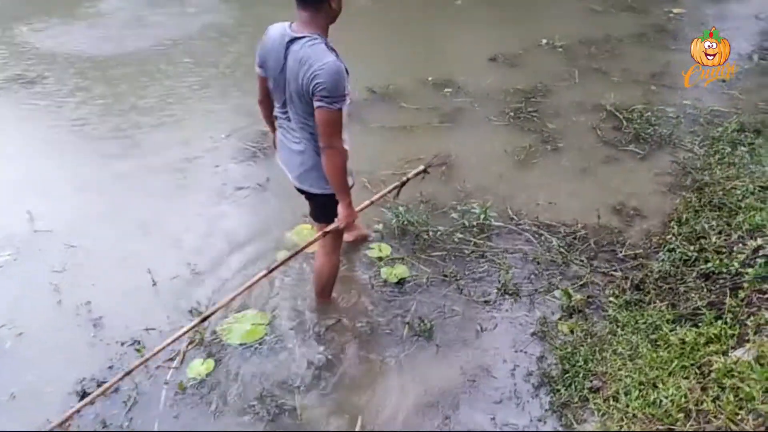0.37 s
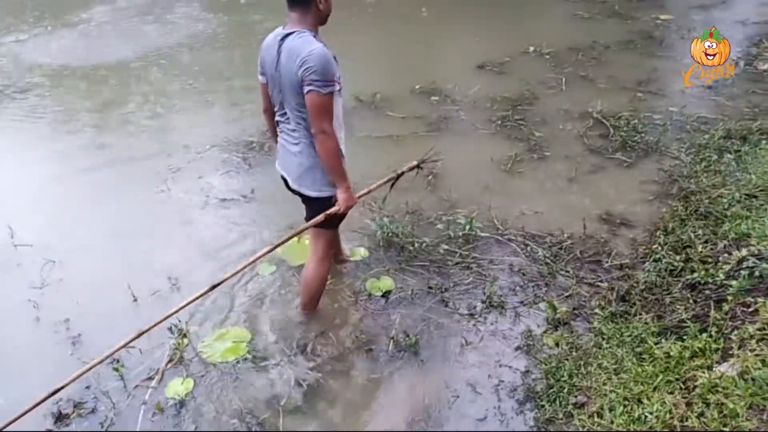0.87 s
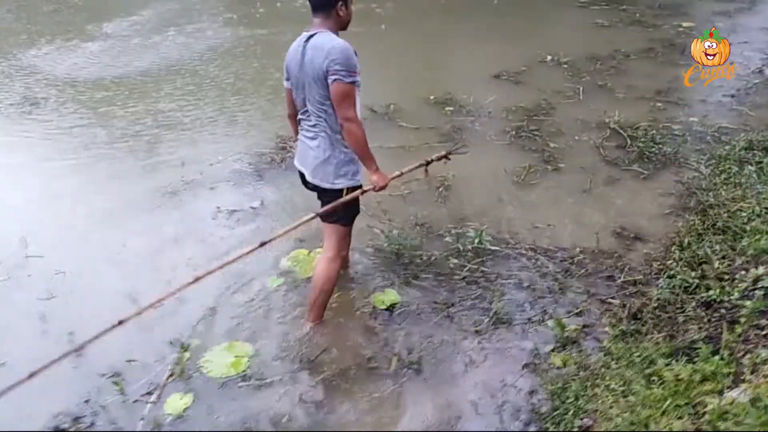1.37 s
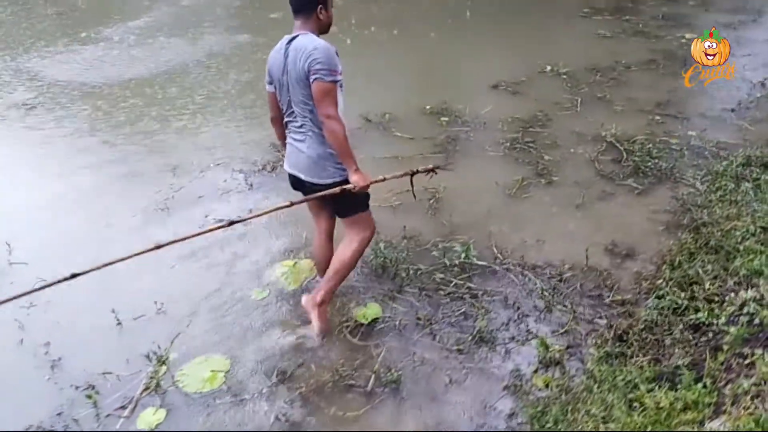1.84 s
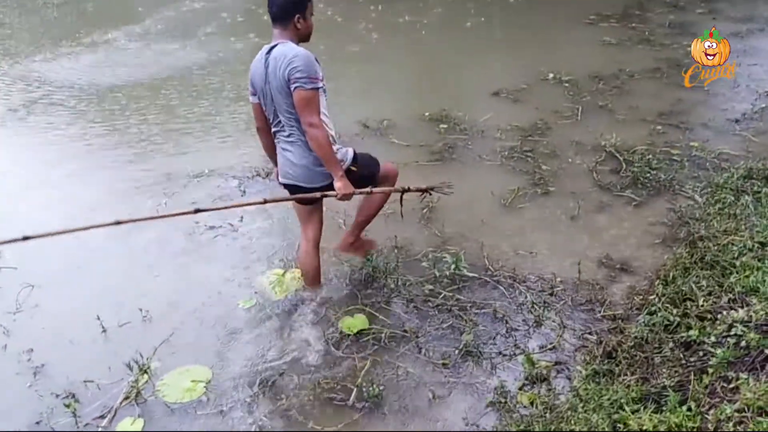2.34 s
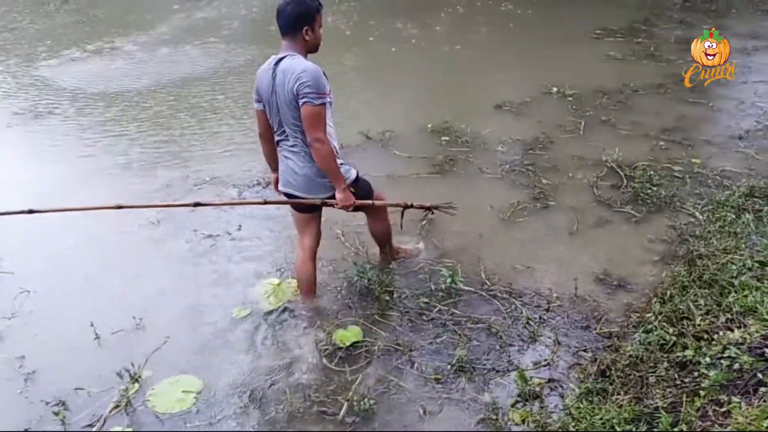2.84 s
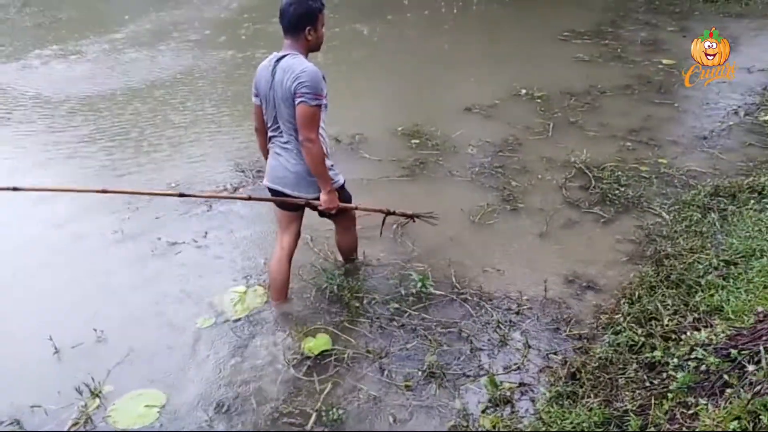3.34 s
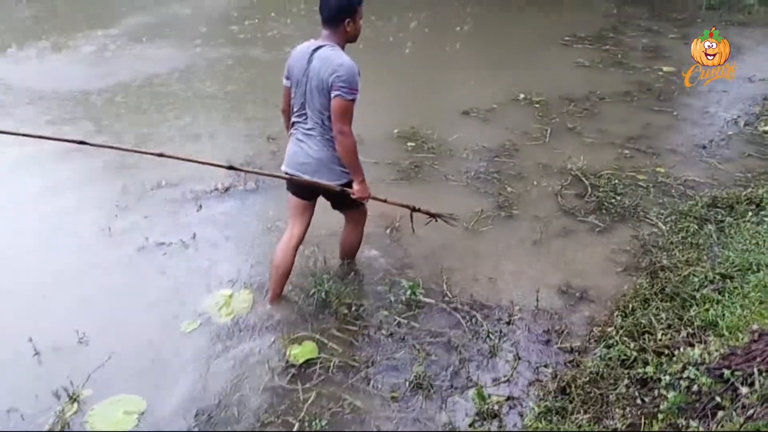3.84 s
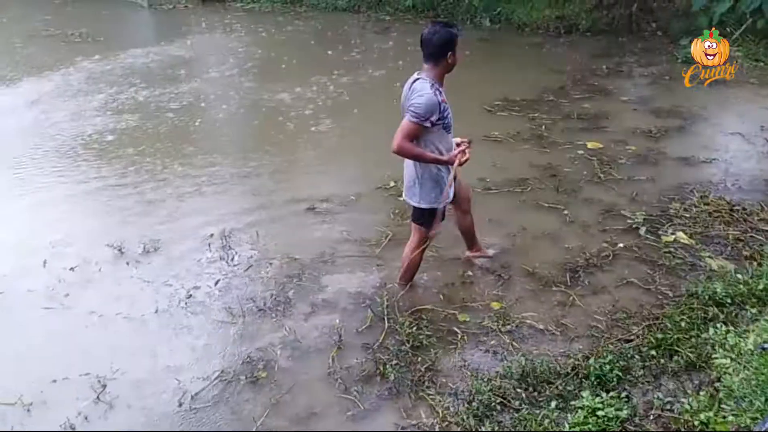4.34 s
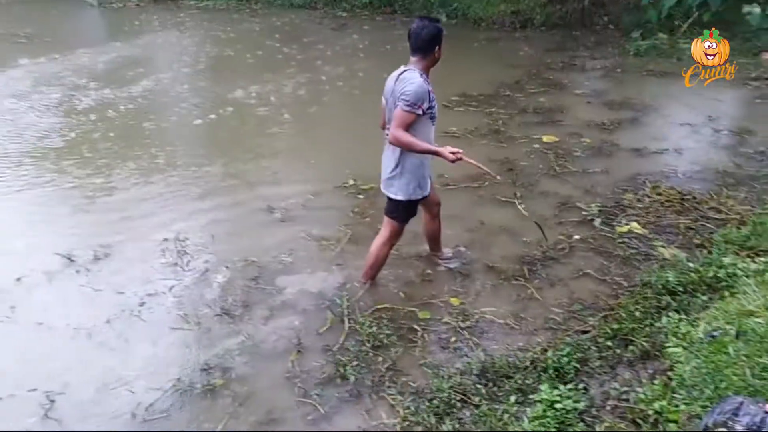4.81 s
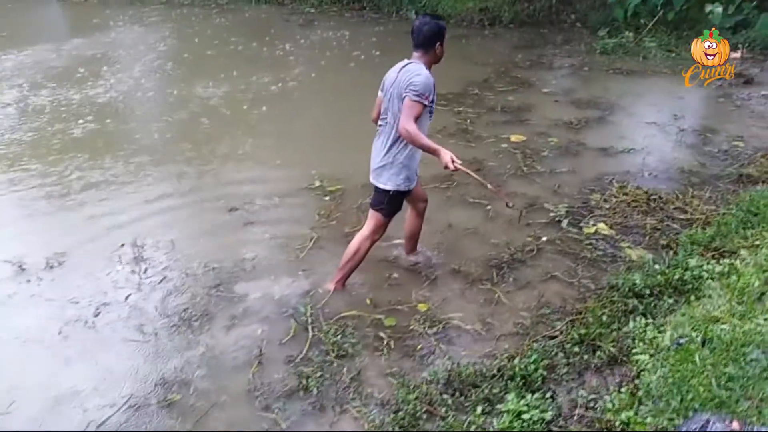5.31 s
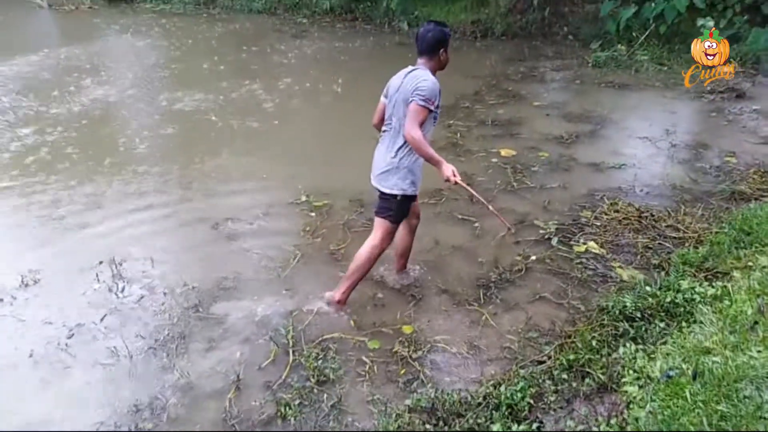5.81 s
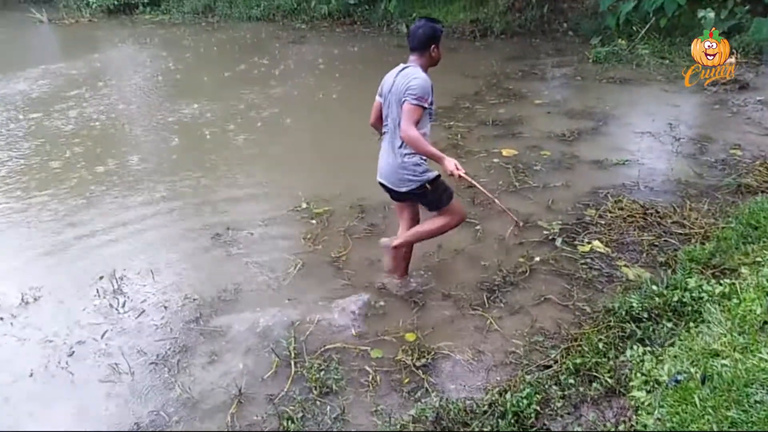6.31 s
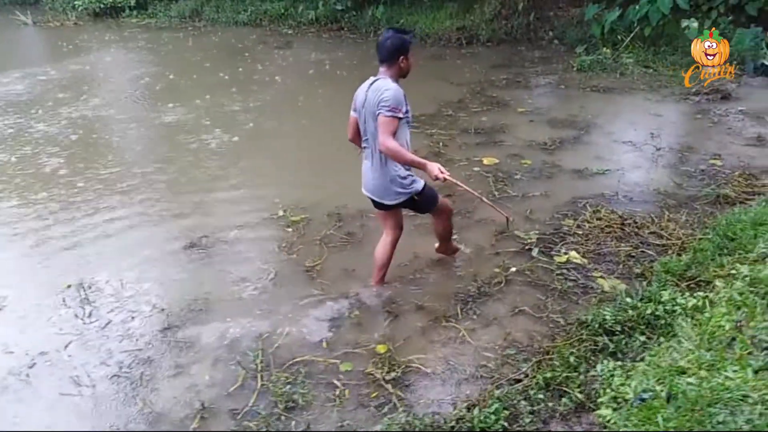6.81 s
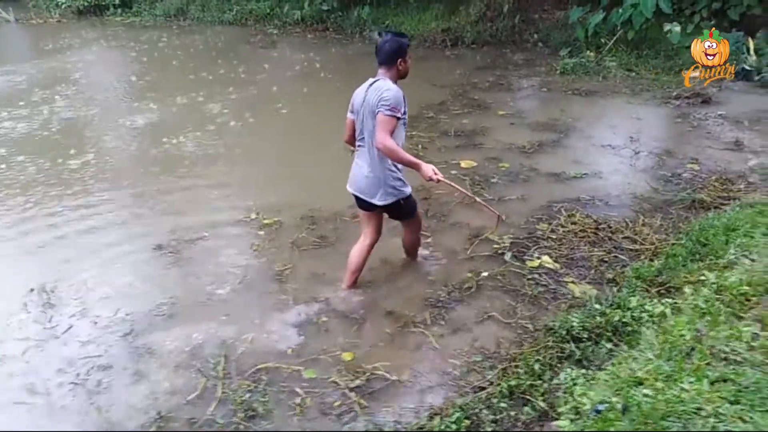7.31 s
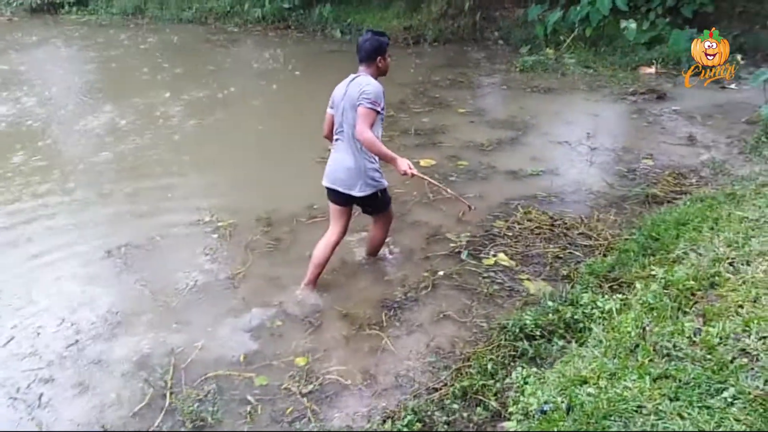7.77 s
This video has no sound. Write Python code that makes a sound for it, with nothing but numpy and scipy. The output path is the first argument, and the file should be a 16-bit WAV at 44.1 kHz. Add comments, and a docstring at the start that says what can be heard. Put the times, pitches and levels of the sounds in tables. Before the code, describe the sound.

A wader's shallow pond in light rain, heard very close through a covered stereo microphone. A low wavering boom and thin, quiet hiss open with faint drips. A soft thud lands at 0.25 seconds, stronger double hits at 0.7 and 1.15, with a small watery plip at 0.95 and another at 1.2. A firm knock comes at 1.7, a duller one at 1.85. Spray ticks sharply on the right from 1.5. From 2.6 to 4.1 thuds crowd together in uneven clusters, each a short push and crack with brief hollow ringing and bubbles, while the boom swells. It falls away around 4.5; a bright tick sounds at 4.74. Softer, duller thumps follow from 5.2 to 5.9. Then only sparse drips and faint gurgles, a bright little cluster at 6.9, and a final quick pair of knocks at 7.75 before quiet hiss.

```python
"""A low boom under a thin rain hiss comes first, with faint drips; then heavy drops thud.
Light rain falls on a shallow pond where someone wades. The boom and hiss are coloured noise.
Heavy drops hit a taut cover over the microphone: short pushes and cracks, then ringing bands of noise.
Small drips are fading sine tones, low bubbles gurgle, and spray ticks on the right in bursts of noise and tones."""
import sys
import numpy as np
from scipy import signal
from scipy.fft import rfft, irfft
from scipy.io import wavfile
from scipy.ndimage import uniform_filter1d

SR = 44100
rng = np.random.default_rng(int(sys.argv[2]) if len(sys.argv) > 2 else 0)


def file_out(sig):
    """Save sig as 16-bit WAV at sys.argv[1]."""
    # one column per channel
    cols = np.atleast_2d(sig).T
    # limit, then scale
    lim = np.clip(cols, -1, 1)
    pcm = np.round(lim * 32767).astype(np.int16)
    wavfile.write(sys.argv[1], SR, pcm)


def invert_db(x):
    """Field ratio 10**(x/20) for x, a level in decibels (scalar or array-like)."""
    u = np.asarray(x, float) / 20
    return 10 ** u


N = 359856  # length in samples

# Heavy drops on the cover: t/s, level/dB, brightness/dB, ring level/dB, knock level/dB, snap f/Hz
HEAVY_DROPS = [(0.251, -24.5, -31.5, 1.5, -2, 1460), (0.678, -15, -37, 0.5, -7.5, 1072),
               (0.706, -16.5, -18, -8.5, -8, 1456), (1.138, -20.5, -13, -2, 3.5, 1500),
               (1.155, -21.5, -17.5, -5, 4, 1535), (1.439, -32.5, -30, -3, -5, 993),
               (1.553, -32, -26, 7, -3, 1400), (1.725, -12.5, -20, -8, 0, 1487),
               (1.859, -16, -50, -13.5, -13, 1028), (2.048, -26.5, -37, 4, -8, 980),
               (2.205, -40, -58, 14, -23, 800), (2.613, -24.5, -30, -4, -2, 1170),
               (2.825, -23, -21, 6.5, 6, 1350), (2.86, -17, -31, -5.5, -19, 1200),
               (3.096, -30, -71, 5.5, -19, 1220), (3.164, -21.5, -11, -4, 1.5, 1327),
               (3.221, -24, -27.5, 6, 3, 1403), (3.253, -23, -24, -1.5, -2.5, 1480),
               (3.328, -20, -23, -1.5, 1.5, 1473), (3.6099, -19, -28, -7, -1.5, 1565),
               (3.62, -21.5, -21, 1.5, -2, 1550), (3.698, -23.5, -54.5, -2.5, -15.5, 1270),
               (3.74, -18.5, -17.5, 3, -0.5, 1410), (3.777, -26, -39, -0.5, -23, 1290),
               (4.048, -20.5, -60, 0.5, -14.5, 1143), (4.081, -29.5, -58.5, -26, -29.5, 1240),
               (4.108, -15.5, -15.5, -7.5, -3, 1445), (4.299, -41, -18, -22, -11, 1240),
               (4.393, -39, -38, -24, -13, 1200), (4.836, -45, -17, -13, -12, 1184),
               (5.235, -26, -35, 4.5, -8.5, 1222), (5.253, -23.5, -40, -10, -9, 1200),
               (5.303, -33.5, -22, -0.5, -11, 1170), (5.586, -26.5, -90, 8.5, -34, 1220),
               (5.593, -22, -70, -1.5, -41, 1176), (5.845, -23.5, -41, -1.5, -4.5, 1045),
               (6.033, -39.5, -19, -1.5, -8.5, 1200), (7.748, -18, -20, -11.5, -7, 1439),
               (7.772, -21, -25.5, -3, -5, 1395)]
# Short pips in the crack of a thud, before a chance lift: f/Hz, level/dB
CRACK_PIPS = [(2700, -49.5), (3550, -42.5), (4400, -43.5), (6500, -46), (8000, -44), (11200, -46)]
# Bands in which the cover rings; each thud scales the two times:
# low f/Hz, high f/Hz, level/dB, time to fall 60 dB/s, rise/s, left-right likeness (0 to 1)
COVER_BANDS = [(105, 324, -10, 0.53, 0.00077, 0.9), (306, 640, -17, 0.37, 0.0011, 0.35),
               (551, 840, -20, 0.53, 0.003, 0.17), (800, 1160, -11.5, 0.16, 0.001, 0.29),
               (1240, 1400, -22, 0.39, 0.00035, 0.067), (1700, 4600, -24, 0.081, 0.0045, 0.25),
               (3200, 4000, -38.5, 0.26, 0.00069, 0.17), (6050, 9600, -42, 0.61, 0.00076, 0.33)]
# Colour of the boom: f/Hz, relative level/dB
BOOM_COLOUR = [(15, -61), (25, -21.5), (68, -0.5), (82, 0), (100, 7), (114, 2.5), (131, 4.5), (150, -2.5),
               (175, -5.5), (211, -20.5), (242, -19), (500, -40), (650, -75.5), (1100, -120)]
# Colour of the rain hiss: f/Hz, relative level/dB
HISS_COLOUR = [(25, 13), (60, 5.5), (100, -9), (150, -7), (350, -9.5), (720, -8.5), (1500, -10),
               (2900, -14.5), (7300, -21), (11500, -24), (12500, -26), (14000, -30.5), (15000, -61.5)]
# Balance of the two microphone ports, the left weaker in most of the treble: f/Hz, left minus right level/dB
PORT_SHADE = [(60, 5), (110, 1), (200, 0.5), (380, -1.5), (700, -3), (1290, -5), (2380, -6), (4400, -10.5),
              (8120, -18.5), (15000, 12.5)]
# How alike the hiss is at the two ports: f/Hz, likeness (-1 to 1)
HISS_LIKENESS = [(60, 0.91), (240, 0.86), (950, -0.13), (3770, 0.061), (15000, 0.74)]
# The clearest drips: t/s, f/Hz, level/dB, length/s
CLEAR_DRIPS = [(0.004, 4800, -55.5, 0.013), (0.251, 6310, -50, 0.013), (0.252, 8210, -52.5, 0.034),
               (0.598, 960, -48, 0.011), (0.648, 423, -51, 0.044), (0.649, 960, -51, 0.042),
               (0.926, 3200, -50.5, 0.059), (0.954, 2260, -57, 0.014), (0.957, 1030, -37.5, 0.011),
               (0.958, 781, -24.5, 0.0081), (1.231, 720, -26, 0.0056), (1.38, 6660, -49, 0.049),
               (1.412, 940, -54, 0.025), (1.432, 7020, -52, 0.053), (1.997, 8620, -44, 0.0085),
               (2.212, 368, -43.5, 0.022), (2.287, 462, -56.5, 0.032), (2.339, 591, -59, 0.026),
               (2.431, 385, -52, 0.027), (2.624, 1157, -49.5, 0.069), (2.728, 6560, -51, 0.023),
               (2.731, 8560, -43, 0.0039), (2.751, 673, -48.5, 0.055), (2.5, 8840, -52, 0.015),
               (2.823, 6770, -52, 0.016), (3.004, 1550, -58.5, 0.069), (3.018, 460, -49.5, 0.11),
               (3.094, 4820, -54.5, 0.023), (3.137, 8740, -43, 0.0076), (3.466, 8200, -50.5, 0.014),
               (3.508, 7200, -49, 0.012), (3.609, 1990, -44, 0.019), (3.659, 1990, -56, 0.021),
               (3.759, 6620, -56, 0.021), (3.877, 9670, -41, 0.0083), (1.54, 8560, -42.5, 0.0084),
               (4.386, 469.4, -36.5, 0.019), (4.766, 3590, -52.5, 0.01), (4.625, 6880, -53.5, 0.013),
               (4.836, 427, -57.5, 0.0037), (4.843, 400, -40, 0.011), (5.427, 7020, -43, 0.0065),
               (5.472, 800, -55.5, 0.029), (5.609, 1820, -63, 0.027), (5.65, 863, -59, 0.042),
               (5.683, 1410, -55, 0.015), (5.684, 1820, -60.5, 0.056), (6.419, 827, -50.5, 0.053),
               (6.784, 461, -51, 0.015), (6.856, 1567, -42, 0.014), (6.888, 1585, -64, 0.025),
               (6.861, 992, -47, 0.012), (6.905, 3110, -44.5, 0.018), (6.906, 4130, -52, 0.013),
               (6.906, 5350, -55.5, 0.024), (6.907, 6850, -46, 0.017), (6.909, 7720, -39, 0.0084),
               (7.355, 636, -53, 0.01), (7.357, 914, -55, 0.012), (7.674, 2130, -56.5, 0.017),
               (7.813, 4500, -48.5, 0.01), (7.816, 6550, -52.5, 0.013), (7.867, 1720, -51.5, 0.044)]
# Ticks of spray: t/s, level/dB, centre f/Hz, left minus right level/dB
SPRAY_TICKS = [(1.5438, -30.5, 5940, -25.5), (1.691, -38.5, 7560, -18), (1.814, -43.5, 8570, -33),
               (1.898, -43, 8900, -29), (2, -48, 9200, -20), (2.34, -47.5, 12700, -26),
               (2.4024, -40, 10800, -27), (2.4515, -44.5, 11400, -42), (2.478, -46, 10600, -25),
               (2.5102, -36.5, 11950, -37), (2.78, -47, 8500, -28), (2.661, -44.5, 9300, -35),
               (2.7363, -40, 6680, -53), (3.14, -51, 8960, -12.5), (3.3275, -45, 9440, -25),
               (3.472, -45.5, 7900, -37), (3.6836, -47, 8800, -20.5), (3.7, -41.5, 8750, -26.5),
               (3.879, -45.5, 9200, -27), (3.941, -47.5, 10100, -22), (1.385, -43.5, 11000, -28),
               (4.349, -42.5, 11900, -27), (4.742, -28.5, 9770, -53.5), (6.909, -40, 7160, -38),
               (4.743, -47, 5230, -33)]
# Boom between thuds: t/s, level/dB
BOOM_LEVEL = [(0, -47.5), (0.42, -45), (0.56, -60), (0.75, -42), (1.36, -55), (1.58, -42.5), (2.27, -49),
              (2.75, -40), (4.05, -38), (4.13, -30.5), (4.21, -44), (4.3, -34), (4.5, -76), (4.92, -87),
              (4.96, -63), (5.18, -76.5), (5.4, -38.5), (5.58, -47), (6.14, -53.5), (6.25, -69),
              (6.32, -51.5), (6.48, -51.5), (6.6, -73), (6.89, -87.5), (6.915, -50.5), (6.97, -77),
              (7.045, -58.5), (7.065, -78.5), (8.16, -88)]
# Rain hiss over time: t/s, level/dB
HISS_LEVEL = [(0, -65), (0.5, -68.5), (0.7, -66), (2.27, -66.5), (2.5, -65.5), (4.3, -67), (4.57, -69.5),
              (5.25, -69), (5.43, -66.5), (6.2, -67), (6.64, -68.5), (7.65, -69.5), (7.93, -66),
              (8.16, -70.5)]
# Narrow tones left by a thud: multiple of the snap f, level against the thud/dB, length/s
THUD_TONES = [(0.66, -26, 0.017), (1.014, -24, 0.05), (1.295, -28, 0.03)]

LEAD_S = 0.01  # room for the pull before the push


def evened(x):
    """Scales a sound to an rms of 1."""
    return x / np.sqrt(np.mean(x ** 2) + 1e-20)


def read(points, hz):
    """Reads a spectrum table along a log-frequency axis."""
    f, value = np.transpose(points)
    return np.interp(np.log(hz + 1), np.log(f + 1), value)


def level_at(points, s):
    """Reads a level table at a time, in dB."""
    return np.interp(s, *np.transpose(points))


def add(mix, s, sound):
    """Adds a sound to the mix from a time in seconds."""
    part = mix[:, round(s * SR):][:, :sound.shape[1]]
    part += sound[:, :part.shape[1]]


def sides(pan_db):
    """Left and right gains for a left-right difference, the louder side at 1."""
    return invert_db(np.array([[min(pan_db, 0)], [min(-pan_db, 0)]]))


def slow_noise(hz):
    """Chance wavering, mostly slower than hz, with an rms of 1."""
    f = np.fft.rfftfreq(N, 1 / SR)
    return evened(irfft(rfft(rng.standard_normal(N)) / (1 + (f / hz) ** 4), N))


def noise(spectrum, same, patchy_db, size):
    """Two-sided coloured noise with drifting patches; the average of both sides has an rms of 1."""
    frames, hz = 4 * N // size + 5, np.fft.rfftfreq(size, 1 / SR)
    a, b, c, d, patches = rng.standard_normal((frames, len(hz), 5)).T
    patches = evened(uniform_filter1d(uniform_filter1d(patches, 8, 0), 8, 1))
    like = np.clip(read(same, hz), -1, 1)[:, None]
    tilt = invert_db(read(PORT_SHADE, hz)[:, None] / 2)
    left, other = a + 1j * b, c + 1j * d
    right = like * left + np.sqrt(1 - like ** 2) * other
    z = np.array([left * tilt, right / tilt])
    z *= invert_db(read(spectrum, hz)[:, None] + patchy_db * patches)
    out = signal.istft(z, nperseg=size, noverlap=3 * size // 4)[1][:, :N]
    return out / np.sqrt(np.mean(out.mean(0) ** 2))


def rain_hiss():
    """Rain on the pond makes a thin, patchy hiss."""
    hiss = noise(HISS_COLOUR, HISS_LIKENESS, patchy_db=2.5, size=512)
    return invert_db(level_at(HISS_LEVEL, np.arange(N) / SR)) * hiss


def cover_boom():
    """The cover booms low under the rain, and each thud lifts the boom for a moment."""
    kick_db, kick_rise_s, kick_t60_s = -18.5, 0.0062, 0.6
    wobble_db, wobble_hz = 1.2, 5.5
    boom = noise(BOOM_COLOUR, [(60, 0.88), (400, 1.0)], patchy_db=0.5, size=4096)
    t = np.arange(N) / SR
    power = invert_db(level_at(BOOM_LEVEL, t) + wobble_db * slow_noise(wobble_hz))[None] ** 2
    t = t[:SR]
    kick = invert_db(kick_db - 60 * t / kick_t60_s) * (1 - np.exp(-t / kick_rise_s))
    for s, db, _, ring_db, *_ in HEAVY_DROPS:
        add(power, s, (invert_db(db + ring_db) * kick[None]) ** 2)
    return np.sqrt(power) * boom


def drip(hz, db, length):
    """A small bubble rings on one throbbing pitch and leaves a faint, blurred after-ring."""
    t = np.arange(6000) / SR
    wobble = rng.standard_normal((2, 6000))
    waver = uniform_filter1d(uniform_filter1d(wobble, 190, axis=1), 190, axis=1) * 11
    blur = evened(uniform_filter1d(uniform_filter1d(wobble[1], 130), 130))
    ring = (1 + waver[0] * np.minimum(t / 0.015, 1)) * np.exp(-(t / length) ** 2)
    after_ring = 0.18 * blur * invert_db(-60 * t / 0.5) * (1 - (t / t[-1]) ** 2)
    start = np.sin(np.pi / 2 * np.minimum(t / 0.0047, 1)) ** 2
    tone = np.sin(2 * np.pi * hz * t + 0.54 * waver[1])
    pan_db = min(3 * read(PORT_SHADE, min(hz, 9000)), 0)
    return invert_db(db) * start * (ring + after_ring) * tone * sides(pan_db)


def gurgles():
    """Small low bubbles ring at chance moments, louder while the boom is strong."""
    out = np.zeros((2, N))
    for u in rng.random((90, 4)):
        s = u[0] * N / SR
        db = level_at(BOOM_LEVEL, s) - 19 + 9 * u[2] ** 2
        add(out, s, drip(300 * 1.9 ** u[1], db, 0.0058 + 0.037 * u[3]))
    return out


def drips():
    """Bubbles ring as clear drips; 300 faint, mostly high pips sound by chance, louder while the hiss is louder."""
    out = np.zeros((2, N))
    for s, hz, db, length in CLEAR_DRIPS:
        add(out, s, drip(hz, db, length))
    for u in rng.random((300, 4)):
        s = u[0] * N / SR
        hz = 500 * 28 ** (u[1] ** 0.33)
        db = -83 + 2.2 * (level_at(HISS_LEVEL, s) + 73) + 7 * u[2] ** 3
        add(out, s, drip(hz, db, 0.0095 + 0.037 * u[3]))
    return out


def spray_ticks():
    """Spray makes sharp spikes of noise and scattered tiny bubbles, each leaving a streaky fizz."""
    out, t = np.zeros((2, N)), np.arange(9000) / SR
    for s, db, hz, pan_db in SPRAY_TICKS:
        u, puff, flutter = rng.random((14, 4)), rng.standard_normal(9000), rng.standard_normal((14, 9000))
        band = signal.butter(3, [hz * 0.65, min(hz * 1.5, 13500)], "band", fs=SR, output="sos")
        puff = signal.sosfilt(band, puff)
        spike_s = 0.003 + 0.0016 * np.arange(2)[:, None] + 0.00038 * u[:2, :1]
        spikes = np.exp(-((t - spike_s) / 0.0002) ** 2).sum(0)
        click = puff * (0.6 * spikes + 0.06 * np.exp(-abs(t - 0.004) / 0.003) + 0.028 * invert_db(-60 * t / 0.3))
        delay = 0.029 * u[:, 3:] ** 5  # the bubbles do not all ring at once
        since = t - 0.004 - delay
        bubble_hz = np.minimum(hz * (0.8 + 0.42 * u[:, :1]), 13400 + 900 * u[:, 2:3])
        fizz = uniform_filter1d(flutter, 110, axis=1) * np.clip(since / 0.005, 0, 1)
        fizz *= invert_db(2.5 - 60 * since / 0.37)
        ping = 0.72 * np.exp(-(since / 0.0046) ** 2)
        bubble_level = invert_db(-24.5 + 7.2 * u[:, 1:2] ** 2 - 600 * delay)  # late ones are fainter
        bubbles = bubble_level * (ping + fizz) * np.sin(2 * np.pi * (bubble_hz * t + u[:, 2:3]))
        add(out, s - 0.002, invert_db(db + 5.5) * (click + bubbles.sum(0)) * sides(pan_db))
    return out


def thud_tones():
    """Each thud leaves narrow, throbbing tones, the upper ones weaker when it is dull."""
    out = np.zeros((2, N))
    for s, db, bright_db, _, _, snap_hz in HEAVY_DROPS:
        for multiple, tone_db, length in THUD_TONES:
            u, hz = rng.random(2), multiple * snap_hz
            level_db = db + tone_db + bright_db * np.clip((hz - 700) / 900, 0, 1) + 6 * u[0]
            add(out, s, drip(hz * (0.97 + 0.06 * u[1]), level_db, length))
    return out


def late_bubbles():
    """A few bubbles ring after each thud, the later ones fainter."""
    out = np.zeros((2, N))
    for s, db, _, ring_db, *_ in HEAVY_DROPS:
        for u in rng.random((4, 3)):
            late = -0.1 * np.log(1 - u[0])  # 0.1 s is the average delay
            level_db = db + ring_db - 25 - 110 * late - 14 * u[1]
            add(out, s + 0.012 + late, drip(260 * 3.2 ** u[1], level_db, 0.008 + 0.02 * u[2]))
    return out


def cover_ring():
    """Blows set bands of the cover ringing in lumps; its crowded modes blur into noise."""
    lumpy_db = 4.5
    out, hz, t = np.zeros((2, N)), np.fft.rfftfreq(N, 1 / SR), np.arange(SR) / SR
    shake = rfft(rng.standard_normal((2, N)))
    for lo_hz, hi_hz, band_db, t60, rise, like in COVER_BANDS:
        power = np.zeros((1, N))
        brightness_share = np.clip((hi_hz - 600) / 900, 0, 1) * (1 if hi_hz < 3000 else 0.3)
        for s, db, bright_db, ring_db, *_ in HEAVY_DROPS:
            length = max(0.62 - 0.0289 * ring_db, 0.1)  # a ring that starts louder dies sooner
            swell_s = rise * 0.67 * -bright_db  # a dull thud swells more slowly
            start_db = db + band_db + ring_db + bright_db * brightness_share
            level = invert_db(start_db - 60 * t / (t60 * length)) * (1 - np.exp(-(t / swell_s) ** 2))
            add(power, s + 0.0015, level[None] ** 2)
        band = 1 / (1 + (lo_hz / (hz + 1)) ** 8) / (1 + (hz / hi_hz) ** 8)
        left, other = irfft(shake * band, N)
        right = like * left + np.sqrt(1 - like ** 2) * other
        ringing = evened(np.array([left, right])) * sides(min(read(PORT_SHADE, lo_hz), 0))
        out += np.sqrt(power) * invert_db(lumpy_db * slow_noise(45) - 1.5) * ringing
    return out


def cracks():
    """Each blow cracks in short high pips, with sharp starts and fading tails."""
    out, t = np.zeros((2, N)), np.arange(1500) / SR
    crack_s = 0.0016
    pip_hz, pip_db = np.transpose(CRACK_PIPS)[:, :, None]
    for (s, db, bright_db, *_), u in zip(HEAVY_DROPS, rng.random((len(HEAVY_DROPS), 4, len(CRACK_PIPS), 1))):
        since = t - LEAD_S - 0.001 * u[0]
        tail = since / (crack_s * (1 + 3 * u[1] ** 2))
        shape = np.exp(-np.where(since < 0, (since / crack_s) ** 2, tail))
        tone = np.cos(2 * np.pi * pip_hz * (0.94 + 0.1 * u[3]) * since)
        pips = invert_db(pip_db + 12.3 * u[2]) * shape * tone
        # a bright thud cracks louder
        add(out, s + 0.004 - LEAD_S, invert_db(db + 0.3 * bright_db) * pips.sum(0) * sides(-5))
    return out


def blow(bright_db, knock_db, snap_hz, u):
    """The cover is pulled, pushed and rebounds in a few milliseconds, with brighter snaps on top."""
    left_lag_s = 0.00057 * u[3]
    t = np.arange(900) / SR - LEAD_S - np.array([[left_lag_s], [0]])
    hz = 312.8 * (0.91 + 0.23 * u[0])
    push = np.exp(-(t * hz / np.where(t < 0, 0.45, 0.8)) ** 2) * np.cos(2 * np.pi * hz * t)
    push -= 0.46 * np.exp(-((t + 0.0012) / 0.00049) ** 2)  # the sharp pull
    knock_hz = 720 * (0.65 + 0.23 * u[1])
    knock = np.exp(-(t / 0.00079) ** 2) * np.cos(2 * np.pi * knock_hz * t)
    snap = np.cos(2 * np.pi * snap_hz * t) + 0.48 * np.cos(2 * np.pi * 1.29 * snap_hz * t)
    snap *= np.exp(-(t / 0.0016) ** 2)
    return 0.63 * push + invert_db(knock_db) * knock + invert_db(bright_db - 6.5) * snap


def thuds():
    """Heavy drops strike the cover: a blow and a crack, then the ringing cover."""
    out = np.zeros((2, N))
    for (s, db, bright_db, _, knock_db, snap_hz), u in zip(HEAVY_DROPS, rng.random((len(HEAVY_DROPS), 4))):
        add(out, s + 0.004 - LEAD_S, invert_db(db) * blow(bright_db, knock_db, snap_hz, u))
    return out + cracks() + cover_ring()


def scene():
    """All sources at the two microphone ports."""
    background = rain_hiss() + cover_boom()
    water = gurgles() + drips() + spray_ticks()
    return background + water + thud_tones() + late_bubbles() + thuds()


def suppress_noise(sound):
    """A noise suppressor lowers treble bins that do not stand out, less under loud thuds."""
    z = signal.stft(sound, nperseg=1024, noverlap=768)[2]
    hz = np.arange(513)[:, None] * SR / 1024
    level_db = 10 * np.log10(uniform_filter1d(abs(z) ** 2, 3, 2) + 1e-20)
    around_db = uniform_filter1d(uniform_filter1d(level_db, 41, 1), 9, 2)
    loud_db = 10 * np.log10(uniform_filter1d((abs(z) ** 2).sum((0, 1)), 5) + 1e-20)
    gain_db = np.clip(0.26 * (level_db - around_db + 4.0), -7, 0)
    gain_db = gain_db + np.clip(0.16 * (loud_db + 46.0), -4, 3) + 0.5
    gain_db *= np.clip((hz - 400) / 2500, 0, 1)  # mostly in the treble
    gain_db -= 60 * (hz > 15500)  # almost nothing is left above this edge in Hz
    return signal.istft(z * invert_db(gain_db), nperseg=1024, noverlap=768)[1][:, :N]


def low_pass(x):
    """Removes everything above the highest recorded frequency."""
    return signal.sosfilt(signal.butter(12, 15800, fs=SR, output="sos"), x)


def record(dry):
    """The microphone drops deep bass, then noise suppression thins the treble."""
    bass_cut = signal.butter(2, 75, "high", fs=SR, output="sos")
    finished = suppress_noise(signal.sosfilt(bass_cut, dry))
    return low_pass(finished)


dry = scene()
out = record(dry)
file_out(out)
```